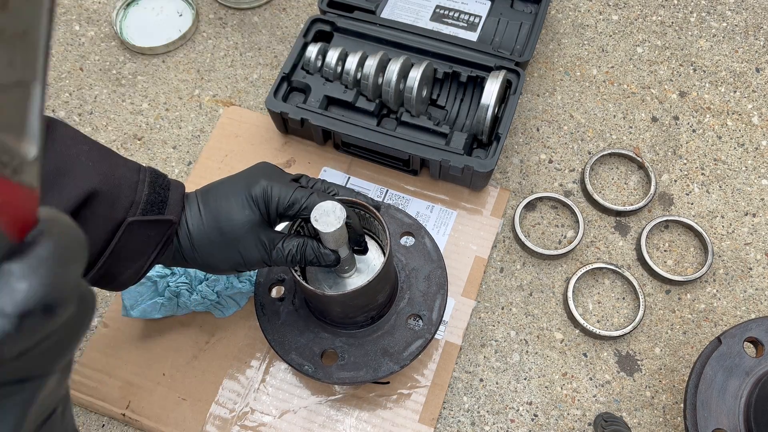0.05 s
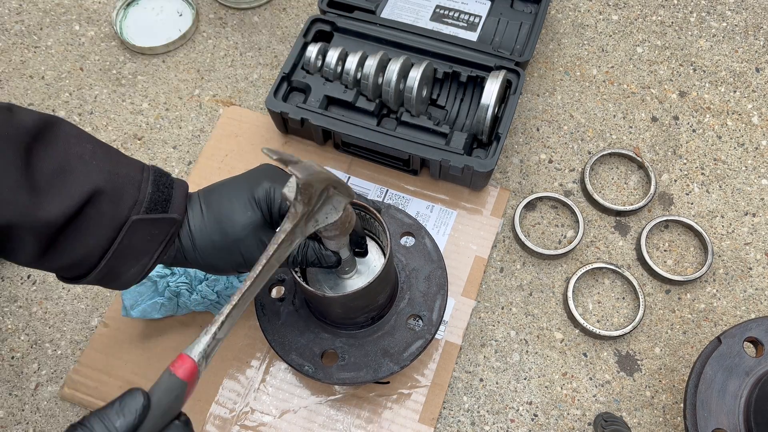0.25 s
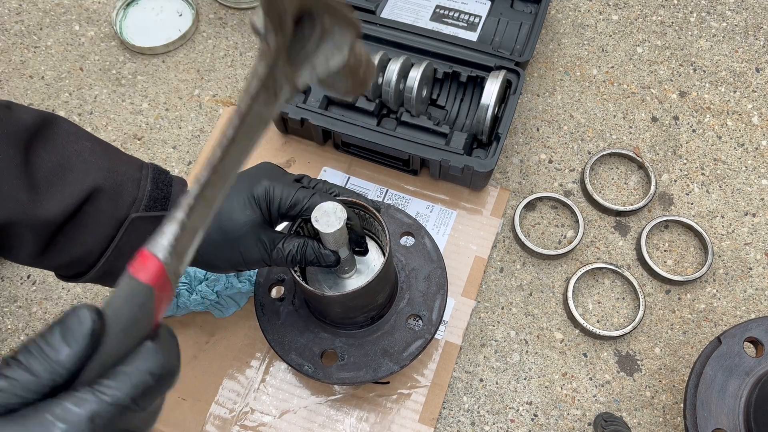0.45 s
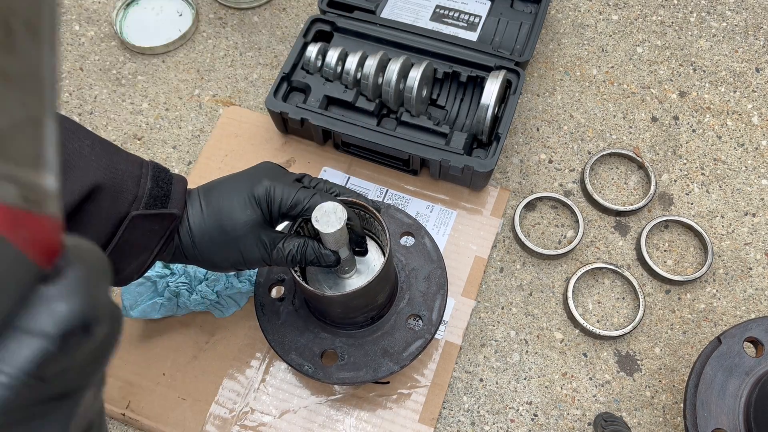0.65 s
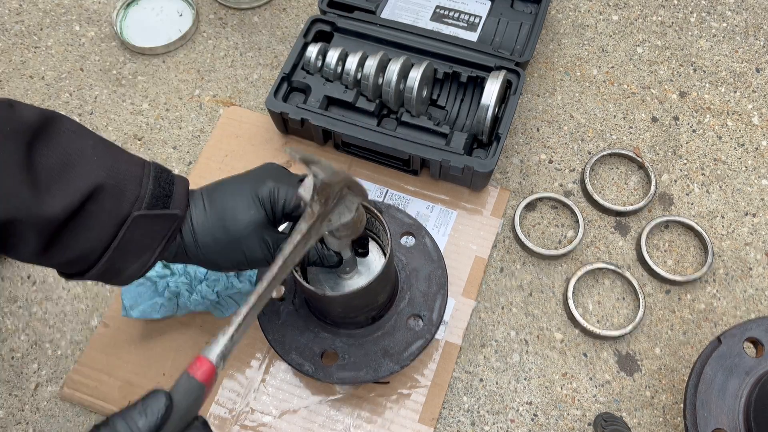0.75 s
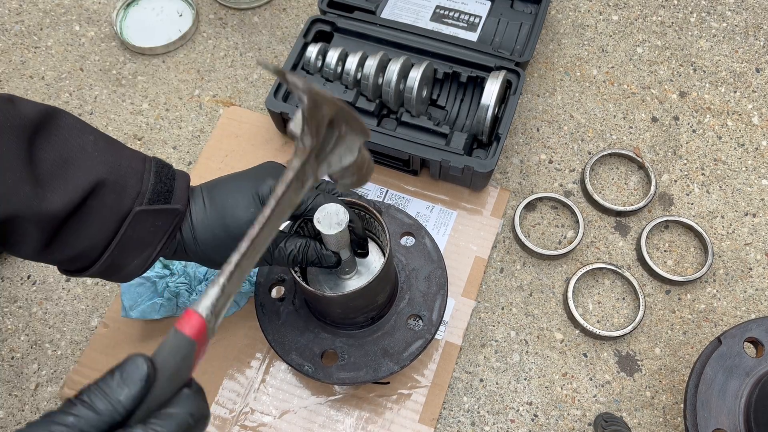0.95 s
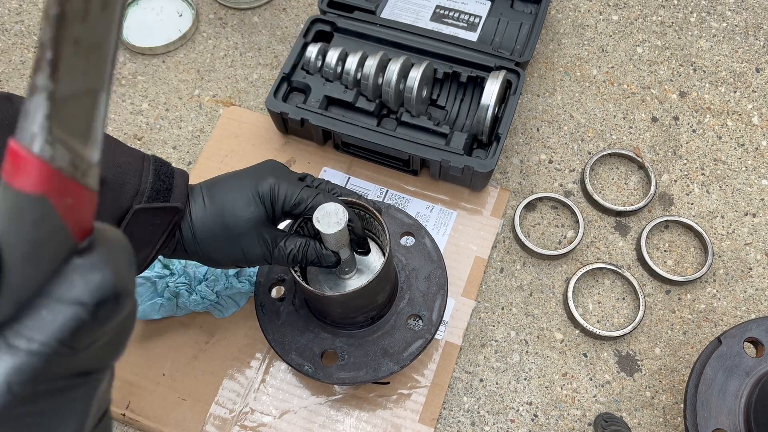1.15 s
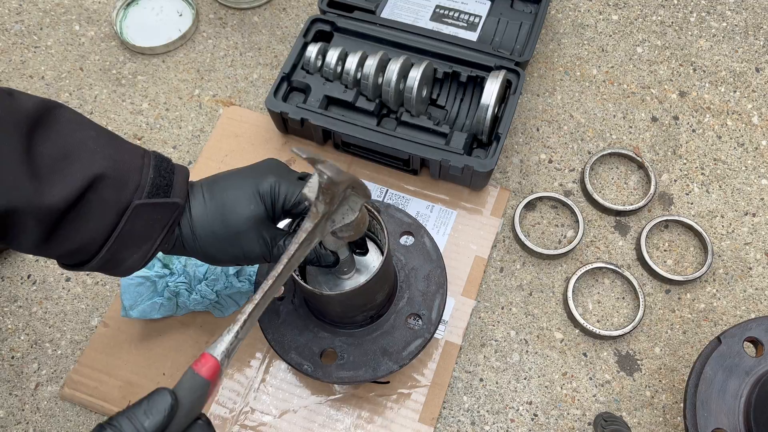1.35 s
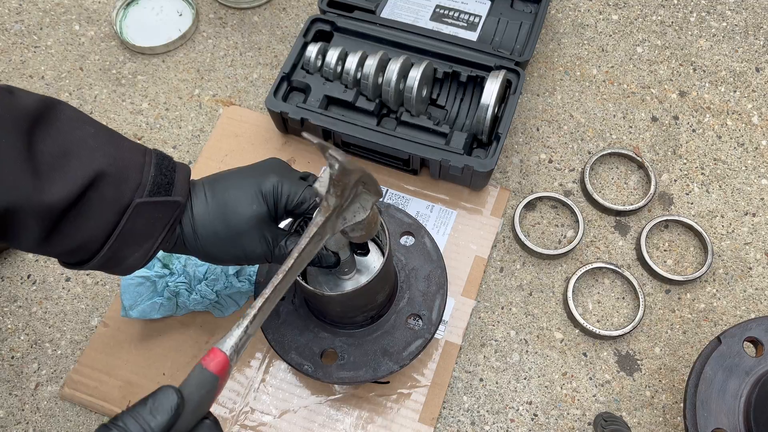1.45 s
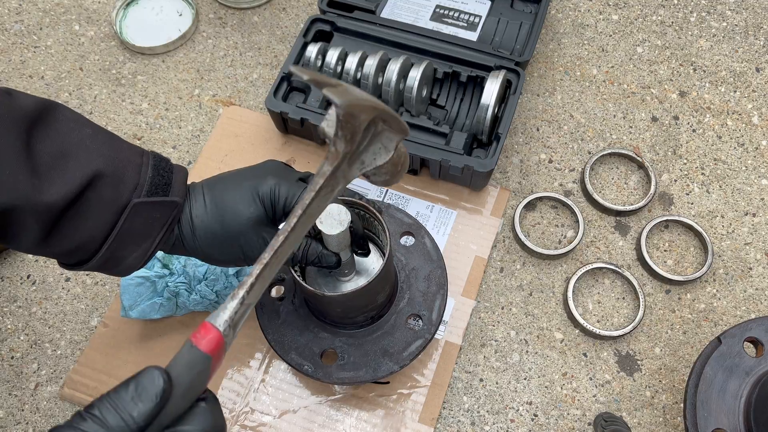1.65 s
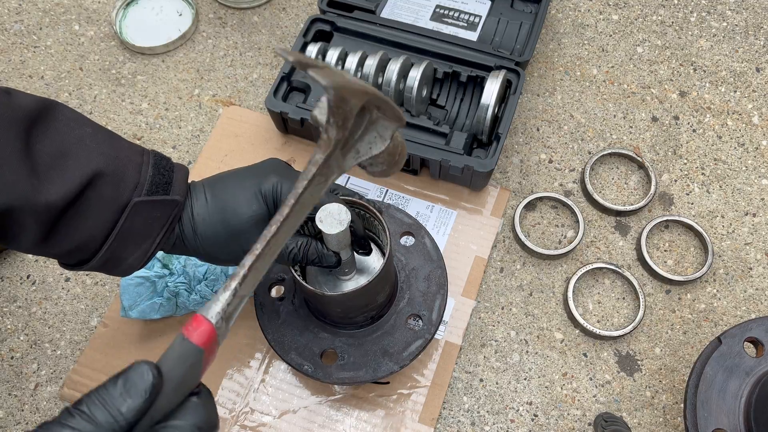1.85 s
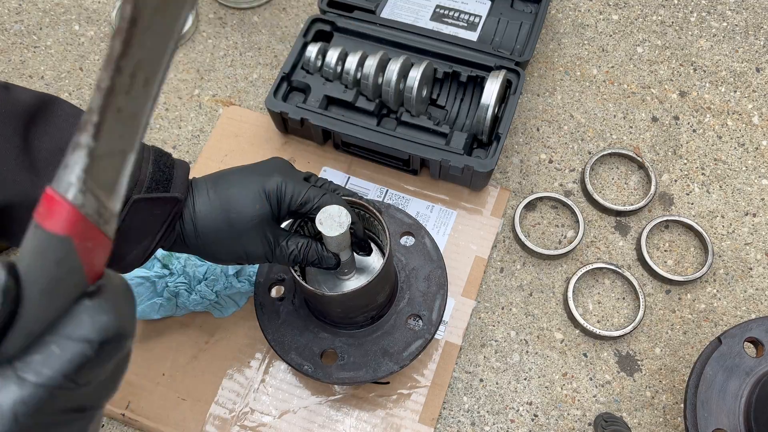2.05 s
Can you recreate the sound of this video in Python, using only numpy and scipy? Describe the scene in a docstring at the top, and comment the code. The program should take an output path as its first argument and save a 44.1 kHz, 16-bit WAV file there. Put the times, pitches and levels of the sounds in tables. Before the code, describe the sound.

Hammer blows on a steel driver seating a ring in a heavy metal hub: a fading ring, three hard cracks with hollow knocks and bright ringing, then two small clinks, close stereo in a lively workshop.

```python
"""The tail of a hammer blow is dying away; three more blows follow, then two light clinks.
A bearing race is driven into a steel hub that stands on cardboard on a concrete floor.
Each new blow layers a noise crack, a hollow sine knock, a dull base note and a falling thump with
ringing steel made of decaying partials; echoes and banded noise tails answer as the workshop.
The loosened driver clinks in the race, over faint filtered-noise rumble that swells near the end."""
import sys
import numpy as np
from scipy import signal
from scipy.io import wavfile

SR = 44100
rng = np.random.default_rng(int(sys.argv[2]) if len(sys.argv) > 2 else 0)


def log_audio(samples):
    """Write samples as a 16-bit WAV file to the path given in sys.argv[1]."""
    # one column per channel
    frames = np.atleast_2d(samples).T
    # limit to full scale, then quantise
    limited = np.clip(frames, -1, 1)
    pcm = np.round(limited * 32767).astype(np.int16)
    wavfile.write(sys.argv[1], SR, pcm)


N = 92610
AGE = np.arange(int(1.1 * SR)) / SR  # time since a sound's onset, s


def from_db(db):
    """Decibels to gain."""
    return 10 ** (np.asarray(db) / 20)


def at_hz(points, hz, axis=1):
    """Reads a column of a table on a log-frequency axis."""
    table = np.array(points)
    return np.interp(np.log(hz), np.log(table[:, 0]), table[:, axis])


def add(out, s, sound):
    """Mixes a sound in from time s; a negative time leaves only its tail."""
    start = int(round(s * SR))
    part = sound[:, max(-start, 0):max(N - start, 0)]
    first = max(start, 0)
    out[:, first:first + part.shape[1]] += part


def place(x, pan_db, lag_s=0):
    """Pans by level, positive to the left, and delays the right."""
    left = x * from_db(pan_db / 2)
    right = np.interp(AGE - lag_s, AGE, x, left=0) * from_db(-pan_db / 2)
    return np.array([left, right])


def pan_gains(pan_db):
    """Left and right gains for a left-right level difference."""
    return from_db([[pan_db / 2], [-pan_db / 2]])


def swell(peak_s, shape=1):
    """Rises to 1 at peak_s and dies away."""
    return (AGE / peak_s * np.exp(1 - AGE / peak_s)) ** shape + 1e-18


def band_filter(low_hz, high_hz):
    """Band-pass filter between two edges."""
    return signal.butter(2, [low_hz, high_hz], "band", fs=SR, output="sos")


def bands(low_hz):
    """Third-octave filters: (centre Hz, share of the whole bandwidth, filter)."""
    steps_down = np.arange(int(3 * np.log2(16500 / low_hz)), -1, -1)
    edges = 16500 / 2 ** (steps_down / 3)
    return [(np.sqrt(a * b), 2 * (b - a) / SR, band_filter(a, b)) for a, b in zip(edges, edges[1:])]


def stereo_noise(size, likeness):
    """White noise, partly alike in the two channels."""
    mid, side = rng.standard_normal((2, size))
    c = np.clip(likeness, -1, 1)
    return np.sqrt((1 + c) / 2) * mid + np.sqrt((1 - c) / 2) * side * np.array([[1], [-1]])


WAVER, WAVER_HZ, WAVER_GROW_S = .55, 22, 0.0073  # depth, new random points per second, build-up


def waver():
    """Reflections build up and shift a partial's strength and phase, separately in each channel."""
    knots = np.arange(80) / max(WAVER_HZ, 1)
    paths = rng.standard_normal((2, len(knots))) + 1j * rng.standard_normal((2, len(knots)))
    drift = np.array([np.interp(AGE, knots, path) for path in paths])
    return 1 + WAVER / np.sqrt(2) * (1 - np.exp(-AGE / WAVER_GROW_S)) * drift


RING_LAG_S = .00005  # right behind left


def ring(pitches, modes):
    """Struck steel rings as decaying partials, a little different every time."""
    out = 0
    for hz, (db, t60, pan) in zip(pitches, modes):
        partial = from_db(db - 60 * AGE / t60) * np.exp(2j * np.pi * hz * AGE)
        right_lag = np.array([[1], [np.exp(-2j * np.pi * hz * RING_LAG_S)]])
        out = out + np.imag(partial * pan_gains(pan) * right_lag * waver())
    return out


CLUSTER_LOW_HZ, CLUSTER_HIGH_HZ = 2913, 9780
CLUSTER_DB, CLUSTER_T60_S, CLUSTER_DB_PER_OCTAVE = -51, 0.4, -4.5


def cluster(count=36):
    """Many weak modes of the cast hub at scattered pitches: the metallic grain of the tail."""
    out = 0
    for k, (offset, left, right) in enumerate(rng.random((count, 3))):
        hz = CLUSTER_LOW_HZ * (CLUSTER_HIGH_HZ / CLUSTER_LOW_HZ) ** ((k + offset) / count)
        gain = from_db(CLUSTER_DB_PER_OCTAVE * np.log2(hz / CLUSTER_LOW_HZ))
        phase = np.array([[left], [right]])  # in turns
        out = out + gain * np.sin(2 * np.pi * (hz * AGE + phase))
    return out * from_db(CLUSTER_DB - 60 * AGE / CLUSTER_T60_S)


ROOM_DB, ROOM_DELAY_S, ROOM_LIKENESS, ROOM_PAN_DB = 3, .012, 0.25, 3
EARLY_DB, EARLY_T60_S = 2, .13  # dense early reflections, relative to the tail
# the workshop's reverberation: (f/Hz, relative level/dB per Hz, t60/s)
ROOM_TAIL = [(150, -4.5, .5), (350, 0, .45), (594, -3, .45), (910, 11.5, .5), (1160, -3, 0.7),
             (1450, -10.5, 0.32), (2060, -7.5, 0.53), (3550, -3.5, 0.6), (5160, -2, 0.6),
             (6900, -9.5, 0.14), (9300, -11.5, 0.33), (12500, -20, 0.38), (16000, -35, .2)]


def workshop():
    """Scattered reflections: a dense early burst and a noise tail with its own decay in each band."""
    out, since = 0, np.maximum(AGE - ROOM_DELAY_S, 0)
    for hz, share, sos in bands(120):
        tail = from_db(-60 * since / at_hz(ROOM_TAIL, hz, axis=2))
        early = from_db(EARLY_DB - 60 * since / EARLY_T60_S)
        decay = (tail + early) * (AGE > ROOM_DELAY_S)
        noise = stereo_noise(len(AGE), ROOM_LIKENESS) * decay / np.linalg.norm(decay)
        out = out + from_db(at_hz(ROOM_TAIL, hz)) * signal.sosfilt(sos, noise)
    return out * from_db(ROOM_DB) * pan_gains(ROOM_PAN_DB)


PAN_DB, RIGHT_LAG_S = 3.6, 0.00016  # place of the knock and base note
WALL_EDGE_HZ = 5000  # echoes lose the top
# hammer blows, the first only dying away; levels relative: (t/s, crack level/dB,
# crack brightness/dB per octave, knock level/dB, knock f/Hz, base note level/dB, shaft level/dB,
# glove damping of the shaft/dB per s, hub level/dB, race level/dB, room level/dB)
HAMMER_BLOWS = [(-.335, 0, 11, 0, 960, -2.5, -1.5, 13.5, 1, -11, 1),
                (0.2069, 0, 2, 0.5, 957.7, 8, -5, 0.5, -2.5, -10, 1.5),
                (0.7518, 1.5, -0.5, -2, 931.4, -8, 1.5, 47, -3, -9.5, 1.5),
                (1.2875, .5, 2, -0.5, 907, 0, -0.5, 29.5, -6, -0.5, 0.5)]
# tone colour of the crack: (f/Hz, relative level/dB per Hz)
CRACK_COLOUR = [(400, 5), (700, -14.5), (1400, -1), (2200, 2.5), (3100, 13.5), (4200, -8), (6500, -9.5),
                (8000, -8), (11000, -6), (14500, -4), (16000, -16.5)]
# ringing modes of the driver's shaft: (f/Hz, t60/s)
SHAFT_RINGING = [(5546, .95), (5572, .55), (10912, .55), (11141, .42), (14650, .5)]
# strength of each shaft mode: (relative level/dB, left-right/dB)
SHAFT_STRENGTH = [(-43, -3), (-43.5, 1), (-37.5, -2.5), (-36, 13), (-56, 9.5)]
# pitches of the hub: f/Hz
HUB_PITCHES = (3340, 4121, 4553, 4645, 4757, 4983)
# ringing of each hub pitch: (relative level/dB, t60/s, left-right/dB)
HUB_RINGING = [(-49.5, 0.44, 4.1), (-36, .38, 6), (-42.5, 0.43, 9.3), (-35.5, .28, 9), (-34, 0.2, 8),
               (-30, 0.14, 9)]
# pitches of the race: f/Hz
RACE_PITCHES = (7531, 7940, 8597)
# ringing of each race pitch: (relative level/dB, t60/s, left-right/dB)
RACE_RINGING = [(-38.5, 0.15, 0), (-31, 0.16, -0.88), (-45.5, 0.13, -2)]
# echoes off the walls: (delay t/s, relative level/dB)
WALL_ECHOES = [(0.0134, -25.5), (0.0538, -25.5)]


def blows():
    """Each impact cracks, knocks and rings the steel; wall echoes and one shared room answer it."""
    out, room, grain = np.zeros((2, N)), workshop(), cluster()
    wall = signal.butter(1, WALL_EDGE_HZ, fs=SR, output="sos")
    shaft_pitches = [hz for hz, t60 in SHAFT_RINGING]
    shaft = [(db, t60, pan) for (hz, t60), (db, pan) in zip(SHAFT_RINGING, SHAFT_STRENGTH)]
    for (s, crack_db, bright_db, knock_db, knock_hz, base_db,
         shaft_db, grip_db, hub_db, race_db, room_db) in HAMMER_BLOWS:
        colour = [(f, db + bright_db * np.log2(f / CRACK_CENTRE_HZ)) for f, db in CRACK_COLOUR]
        body = from_db(knock_db) * knock(knock_hz) + from_db(base_db) * base_note()
        hit = from_db(crack_db) * crack(colour) + place(body, PAN_DB, RIGHT_LAG_S)
        steel = from_db(shaft_db - max(grip_db, 0) * AGE) * ring(shaft_pitches, shaft)
        steel = steel + from_db(hub_db) * ring(HUB_PITCHES, HUB_RINGING)
        steel = steel + from_db(race_db) * ring(RACE_PITCHES, RACE_RINGING)
        add(out, s, hit + steel + grain + from_db(room_db) * room)
        for delay_s, echo_db in WALL_ECHOES:
            add(out, s + delay_s, from_db(echo_db) * signal.sosfilt(wall, hit))
    return out


BACKGROUND_LIKENESS = 0.3
# colour of the background: (f/Hz, relative level/dB per Hz)
BACKGROUND_COLOUR = [(25, -9.5), (50, -1.5), (120, 2), (200, -8), (400, -16), (900, -13.5), (1600, -21),
                     (3000, -31), (6000, -40.5), (9000, -50.5), (16000, -56.5)]
# loudness of the background over time: (t/s, level/dB)
BACKGROUND_LEVEL = [(0, -57.5), (.7, -59), (1.2, -62), (1.65, -63), (2.1, -62.5)]


def background():
    """Faint far rumble and hiss, from noise shaped band by band."""
    noise = 0
    for hz, share, sos in bands(20):
        band = signal.sosfilt(sos, stereo_noise(N, BACKGROUND_LIKENESS))
        noise = noise + from_db(at_hz(BACKGROUND_COLOUR, hz)) * band
    level_db = np.interp(np.arange(N) / SR, *np.transpose(BACKGROUND_LEVEL))
    return noise / noise.std() * from_db(level_db)


THUMP_START_HZ, THUMP_END_HZ, THUMP_FALL_S = 650, 27.8, 0.0017  # half the fall takes THUMP_FALL_S
SWAY_HZ, SWAY_PEAK_S, SWAY_SHAPE = 51.8, .06, 1.2  # slow after-shake of the base
BASS_PAN_DB, BASS_LEAD_RAD = 3.4, .6  # the right side runs ahead in the deep bass
# thumps of the hub on its cardboard: (t/s, relative level/dB, time to peak t/s,
# after-shake relative level/dB)
CARDBOARD_THUMPS = [(0.2064, -15, 0.015, -31), (0.3254, -23.5, 0.0051, -67), (0.7529, -36.5, 0.0093, -67),
                    (1.2869, -26.5, 0.011, -42.5), (1.379, -44.5, 0.0076, -54.5),
                    (1.584, -44.5, 0.013, -57)]


def thumps():
    """The hub sinks into the cardboard: a thud that falls quickly in pitch, and a slower shake."""
    out, lead = np.zeros((2, N)), np.array([[0], [BASS_LEAD_RAD]])
    hz = THUMP_END_HZ + (THUMP_START_HZ - THUMP_END_HZ) / (1 + AGE / THUMP_FALL_S)
    thud = np.sin(2 * np.pi * np.cumsum(hz) / SR + lead)
    sway = swell(SWAY_PEAK_S, SWAY_SHAPE) * np.sin(2 * np.pi * SWAY_HZ * AGE + lead)
    for s, db, peak_s, sway_db in CARDBOARD_THUMPS:
        add(out, s, from_db(db) * swell(peak_s) * thud + from_db(sway_db) * sway)
    return out * pan_gains(BASS_PAN_DB)


CRACK_DB, CRACK_PEAK_S, CRACK_RING_DB, CRACK_RING_S = 9.5, .00065, -19, .007
CRACK_CENTRE_HZ, CRACK_RING_DB_PER_OCTAVE = 3370, 4.5  # more ring in the treble
CRACK_LIKENESS, CRACK_PAN_DB, CRACK_LAG_S = 0.9, 1.2, .00013


def crack(colour):
    """Steel meets steel: a noise burst of a few milliseconds with a short, dense ring in the treble."""
    out = 0
    for hz, share, sos in bands(300):
        ring_db = CRACK_RING_DB + CRACK_RING_DB_PER_OCTAVE * np.log2(hz / CRACK_CENTRE_HZ)
        shape = swell(CRACK_PEAK_S) + from_db(ring_db) * np.exp(-AGE / CRACK_RING_S)
        burst = signal.sosfilt(sos, shape * stereo_noise(len(AGE), CRACK_LIKENESS))
        burst = burst / np.linalg.norm(burst, axis=1, keepdims=True)  # equal energy every time
        out = out + burst * np.sqrt(share) * from_db(at_hz(colour, hz))
    placed = [place(side, CRACK_PAN_DB, CRACK_LAG_S)[k] for k, side in enumerate(out)]
    return from_db(CRACK_DB) * np.array(placed)


KNOCK_DB, KNOCK_PEAK_S, KNOCK_SHAPE = -6, 0.003, 4.3  # level before each blow's own


def knock(hz):
    """The hollow of the hub sounds for a few cycles."""
    return from_db(KNOCK_DB) * swell(KNOCK_PEAK_S, KNOCK_SHAPE) * np.sin(2 * np.pi * hz * AGE)


BODY_HZ, BODY_DB, BODY_PEAK_S = 365.8, -25.5, 0.0021  # level before each blow's own


def base_note():
    """The base under the hub answers with a short dull note."""
    return from_db(BODY_DB) * swell(BODY_PEAK_S) * np.sin(2 * np.pi * BODY_HZ * AGE)


CLINK_LOW_HZ, CLINK_HIGH_HZ = 2100, 5460  # the range in which a clink stirs the room
# light clinks of the driver: (t/s, ring relative level/dB, tick relative level/dB,
# extra level of the lowest mode/dB, glove damping/dB per s with negatives as none,
# room relative level/dB)
DRIVER_CLINKS = [(1.5663, -2, -34, -2.5, -6, -27), (1.8946, -7.5, -33, -6, 46, -26)]
# tone colour of the clink's tick: (f/Hz, relative level/dB per Hz)
TICK_COLOUR = [(600, -33.5), (1400, -18), (1800, -25), (2400, 21.5), (3300, 9), (5000, 12.5), (7500, -9),
               (10000, -31), (13500, -2), (16000, -13)]
# pitches of the loosely held driver: f/Hz
LOOSE_PITCHES = (2484, 2503, 3763, 4557, 4638, 4757, 5548, 6040, 7940, 12520)
# ringing of each loose pitch: (relative level/dB, t60/s, left-right/dB)
LOOSE_RINGING = [(-34, .15, 3), (-60, 0.35, 10), (-46.5, 0.14, 7.5), (-61, 0.28, 13), (-50, 0.28, 4),
                 (-49.5, 0.42, 7.5), (-53, 0.52, 3.5), (-59, 0.26, -20), (-59.5, 0.43, 0), (-54, 0.079, 3)]


def clinks():
    """The driver, no longer pressed down, touches the race with a tick and rings."""
    out = np.zeros((2, N))
    room = signal.sosfilt(band_filter(CLINK_LOW_HZ, CLINK_HIGH_HZ), workshop())
    for s, ring_db, tick_db, low_db, grip_db, room_db in DRIVER_CLINKS:
        steel = from_db(low_db) * ring(LOOSE_PITCHES[:1], LOOSE_RINGING[:1])
        steel = steel + ring(LOOSE_PITCHES[1:], LOOSE_RINGING[1:])
        damped = from_db(ring_db - max(grip_db, 0) * AGE) * steel
        add(out, s, damped + from_db(tick_db) * crack(TICK_COLOUR) + from_db(room_db) * room)
    return out


RUMBLE_S, RUMBLE_WIDTH_S, RUMBLE_DB = 1.76, 0.32, -58.5  # centre, width and peak level of the swell
RUMBLE_LOW_HZ, RUMBLE_HIGH_HZ = 70, 178


def rumble():
    """Soft low band-passed noise comes and goes after the last blow."""
    noise = stereo_noise(N, BACKGROUND_LIKENESS)
    noise = signal.sosfilt(band_filter(RUMBLE_LOW_HZ, RUMBLE_HIGH_HZ), noise)
    envelope = np.exp(-((np.arange(N) / SR - RUMBLE_S) / RUMBLE_WIDTH_S) ** 2)
    return from_db(RUMBLE_DB) * noise / noise.std() * envelope


def scene():
    """All layers sounding together."""
    return blows() + background() + thumps() + clinks() + rumble()


TREBLE_EDGE_HZ, CUTOFF_HZ = 14700, 16800


def record(dry):
    """The highest peaks are rounded and the top is cut."""
    rounded = dry / (1 + (dry / .92) ** 6) ** (1 / 6)
    dulled = signal.sosfilt(signal.butter(10, TREBLE_EDGE_HZ, fs=SR, output="sos"), rounded)
    return signal.sosfilt(signal.cheby2(12, 60, CUTOFF_HZ, fs=SR, output="sos"), dulled)


dry = scene()
out = record(dry)
log_audio(out)
```